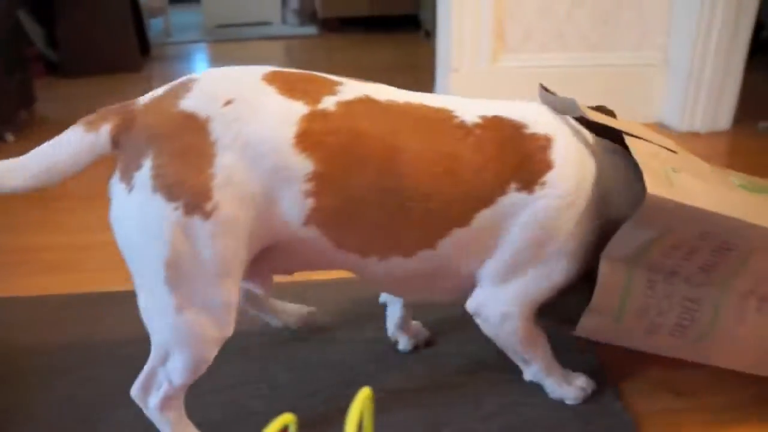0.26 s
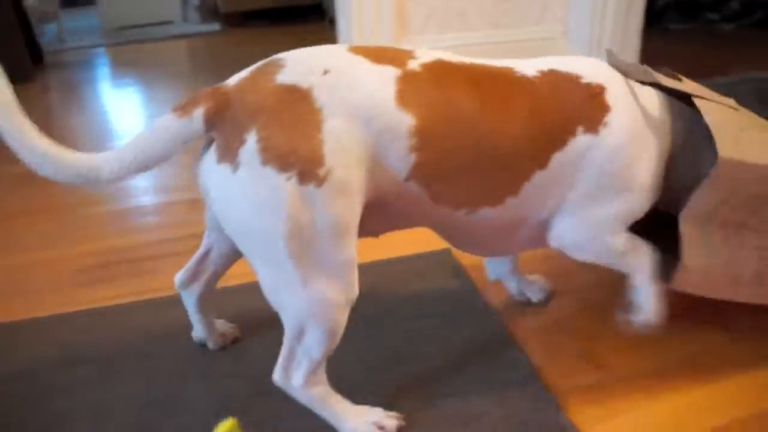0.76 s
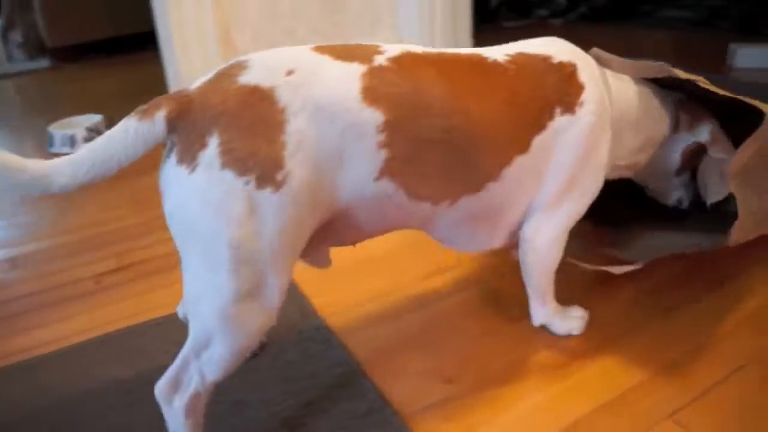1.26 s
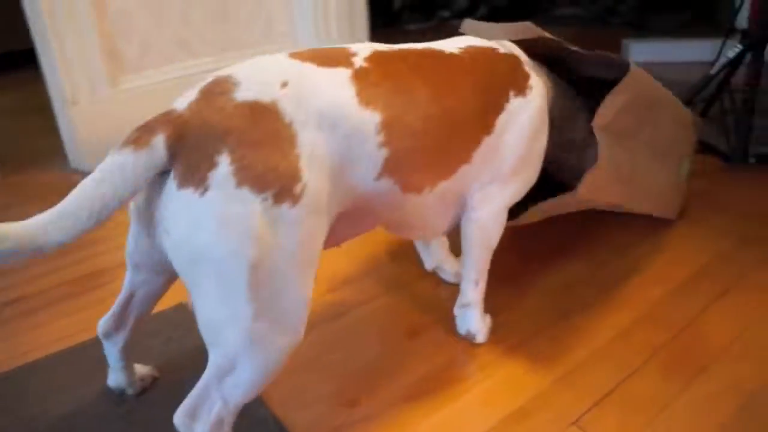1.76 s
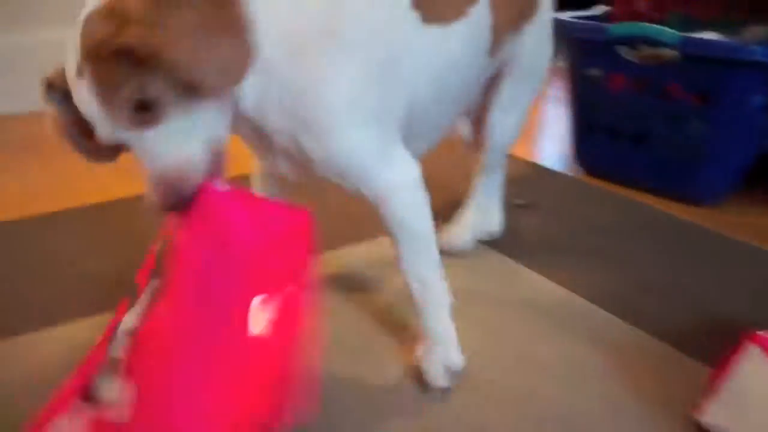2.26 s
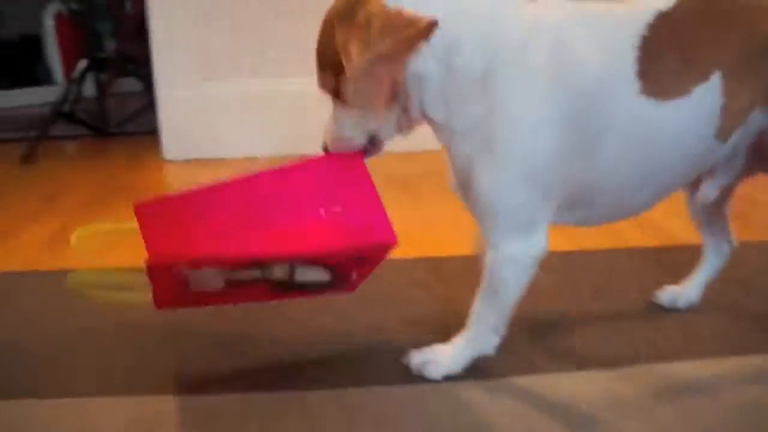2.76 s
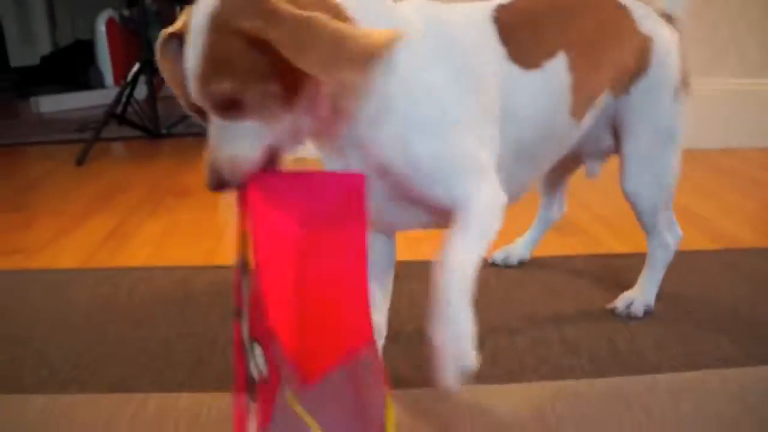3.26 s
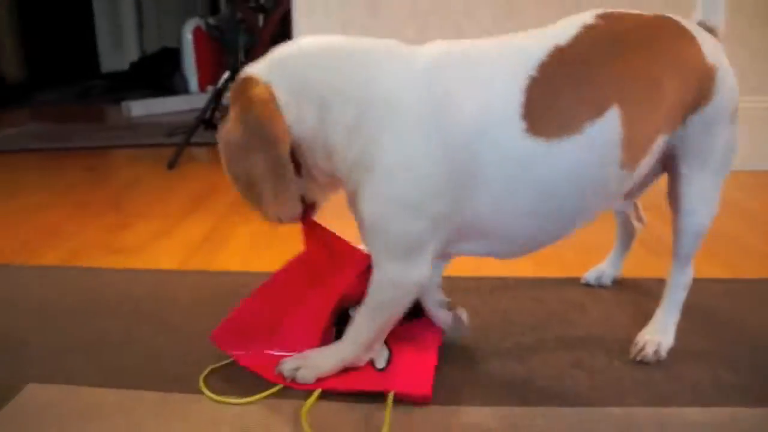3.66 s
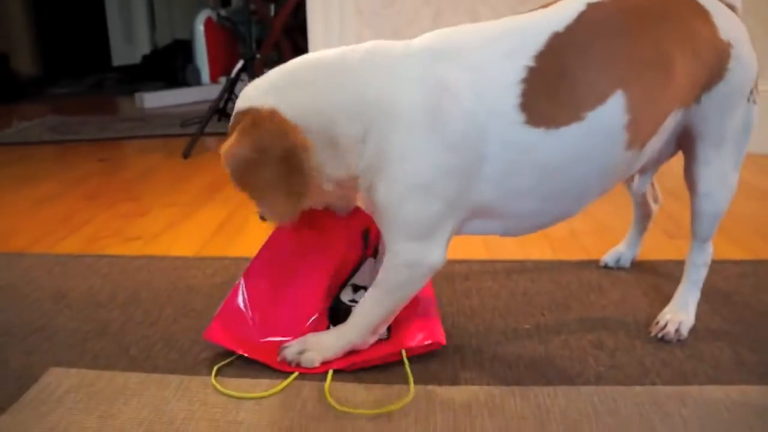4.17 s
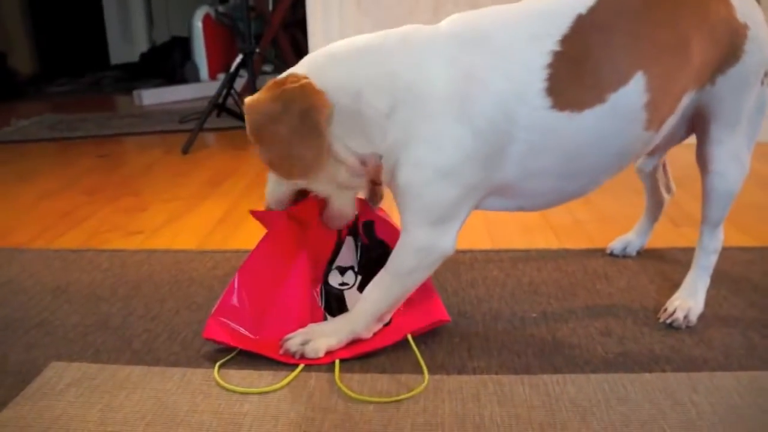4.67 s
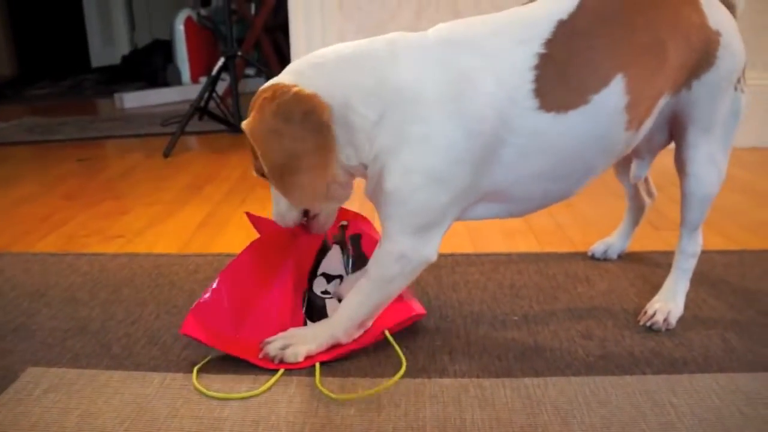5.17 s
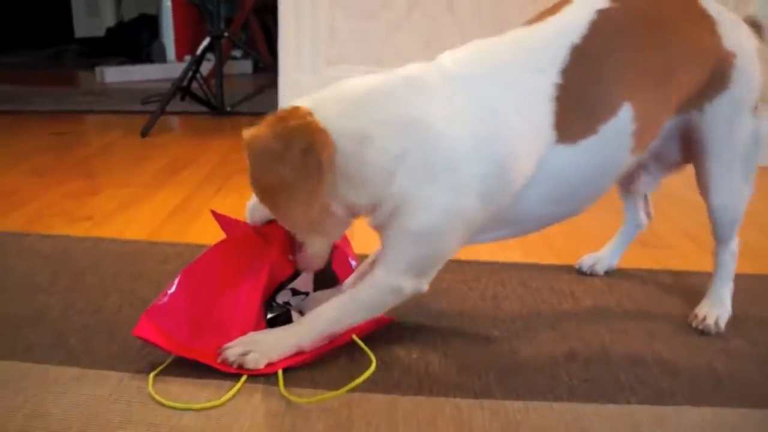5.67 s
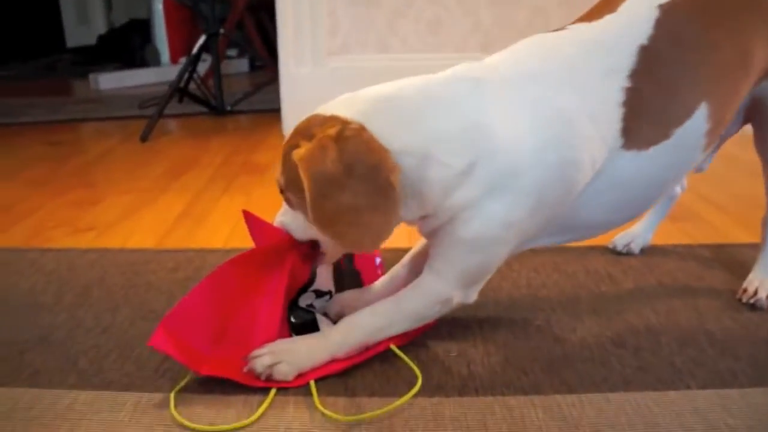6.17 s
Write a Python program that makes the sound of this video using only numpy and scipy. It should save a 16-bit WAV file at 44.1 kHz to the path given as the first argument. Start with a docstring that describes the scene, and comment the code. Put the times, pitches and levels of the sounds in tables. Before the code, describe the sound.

Close stereo sound of a dog working paper bags on a rug. First, smooth rubbing and crinkling inside a hollow paper sack with scattered pops; from about two seconds, louder thumps, knocks and crisp snaps as a stiff gift bag is shaken, pawed and torn. Soft paw steps lie beneath. The living room answers briefly, over faint rumble and hiss.

```python
"""Living room, close to a dog on a rug: it roots in a big paper sack, then paws and rips a stiff gift bag.
Each shove is shaped noise, rubbing and crinkling the sheets, while paws tread softly on the floor.
Runs of uneven jolts ring damped paper panels: sharp snaps and short crumpling runs.
Two microphones hear the room ring briefly after every snap, over a faint rumble and hiss of filtered noise."""
import sys
import numpy as np
from scipy import signal
from scipy.fft import rfft, irfft, next_fast_len
from scipy.io import wavfile
from scipy.ndimage import uniform_filter1d, map_coordinates

SR = 44100
rng = np.random.default_rng(int(sys.argv[2]) if len(sys.argv) > 2 else 0)


def file_out(sig):
    """Save sig as 16-bit WAV at sys.argv[1]."""
    # one column per channel
    cols = np.atleast_2d(sig).T
    # limit, then scale
    lim = np.clip(cols, -1, 1)
    pcm = np.round(lim * 32767).astype(np.int16)
    wavfile.write(sys.argv[1], SR, pcm)


N = 283122

# half-octave band edges in Hz
BAND_EDGES_HZ = 22 * 2 ** np.arange(0, 9.6, .5)

# colour of the house background: pitch_hz, level_db (per Hz, relative)
HOUSE_COLOUR = [(25, -17), (60, -16), (140, 5), (350, -36), (1000, -39), (3000, -35), (14000, -28.5)]
HOUSE_DB = -64.5
# likeness of diffuse sound at the two microphones: pitch_hz, likeness (correlation)
LIKENESS = [(30, .75), (80, 0.98), (300, 0.97), (1000, 0.86), (2000, 0.75), (4000, 0.23), (12000, 0.057)]
# colour difference between the two microphones: pitch_hz, right_minus_left_db
MICROPHONES = [(100, -1), (300, -0.1), (700, -1.5), (2200, 0.5), (4500, 1), (8000, -0.7), (13000, -2)]
CUTOFF_HZ = 15500

# decay of the room: pitch_hz, t60_s
ROOM_T60 = [(100, 1), (260, 0.61), (480, 0.39), (700, 0.3), (1840, 0.41), (4850, 0.36), (14000, 0.28)]
# strength of the reverberation: pitch_hz, level_db
ROOM_COLOUR = [(110, -2.5), (210, -4), (300, 1), (430, -0.5), (800, 3), (1700, -2.5), (3000, -0.5),
               (5000, -2), (14000, -2.5)]
# where the bag lies: start_s, left_lag_ms, right_minus_left_db, room_db
PLACE = [(0, 0.083, 3.5, -6), (.7, 0.073, 4, -2.5), (1.2, 0.073, 3, -6), (1.45, 0.05, 3, -2.5),
         (2.1, -0.078, 2, -2), (2.5, -0.045, 0, -3.5), (3.2, -0.027, 1.5, -4), (4.0, 0.0048, 1, -4),
         (5.0, -0.014, 1, -5), (6.4, -0.04, 0.5, -7)]

# the dog treads and braces itself on the floor: start_s, level_db (before the rustle trim)
STEPS = [(0.291, -43), (0.66, -40.5), (0.752, -43.5), (0.9, -47), (1.47, -35.5), (1.69, -44), (2.06, -38.5),
         (2.38, -32.5), (2.45, -36), (2.57, -42), (2.78, -44.5), (3.04, -37), (3.56, -39), (3.66, -39.5),
         (3.75, -42), (3.929, -35.5), (4.2, -45), (4.36, -47), (5.02, -50), (5.1, -49), (5.18, -50),
         (5.6, -46)]
STEP_RISE_S, STEP_DECAY_DB_PER_S = 0.0059, 172
# the loose bag scuffs along the floor, the pinned one hardly:
# start_s, level_db (for a bag body at full scale, before the rustle trim)
SCUFFING = [(0, -33.5), (1.4, -35), (2.0, -37), (2.5, -36.5), (3.3, -33), (4.5, -37), (5.4, -42.5),
            (6.4, -55.5)]
SCUFF_FOLLOWS = 0.39   # share of the body's swing in dB

# light brushing of the paper between shoves: start_s, level_db (before colour and rustle trim)
BRUSHING = [(0, -48), (0.42, -49.5), (0.8, -60), (1.22, -56), (1.32, -61), (1.35, -47), (1.5, -56.5),
            (1.8, -57.5), (2.2, -45), (2.32, -72), (2.4, -56), (2.8, -53), (2.9, -70), (2.98, -82),
            (3.2, -52.5), (4.45, -45), (4.55, -61), (5.95, -54), (6.05, -71), (6.26, -64), (6.42, -46)]
# colour of the brushing, one offset each: sheet_db, body_db, hiss_db
BRUSH_COLOUR_DB = (-1, -4, -2.5)
# each shove, tug or rip of the dog: start_s, length_s, sheet_db, body_db, hiss_db (before the rustle trim)
SHOVES = [(0.102, 0.068, -35, -40, -40), (0.19, 0.16, -39.5, -42, -43), (0.471, 0.078, -35, -41, -43),
          (0.556, 0.14, -41.5, -60, -42.5), (0.66, 0.038, -38, -38, -50), (0.72, 0.093, -48, -64, -44),
          (0.843, 0.21, -34.5, -40.5, -39.5), (1.09, 0.17, -46, -53.5, -47),
          (1.358, 0.079, -31, -39.5, -40.5), (1.446, 0.055, -29, -35.5, -52), (1.56, 0.044, -43, -44, -50),
          (1.66, 0.062, -48.5, -44.5, -58), (1.904, 0.11, -43, -39.5, -47),
          (2.041, 0.026, -27.5, -30.5, -39), (2.088, 0.12, -49, -66, -40.5), (2.326, 0.022, -48, -52, -49),
          (2.37, 0.16, -29.5, -31.5, -41), (2.53, 0.097, -29.5, -34, -43),
          (2.734, 0.041, -38.5, -38.5, -57), (2.97, 0.12, -45.5, -41.5, -60.5),
          (3.068, 0.14, -26, -33, -37), (3.29, 0.043, -34.5, -40, -57), (3.427, 0.13, -38, -39.5, -47),
          (3.523, 0.13, -27, -32, -38), (3.658, 0.13, -28, -32.5, -45), (3.81, 0.043, -31.5, -48, -60),
          (3.945, 0.22, -31, -37, -44), (4.164, 0.14, -34.5, -39.5, -63), (4.361, 0.041, -29.5, -39, -48),
          (4.56, 0.4, -48, -50.5, -64), (4.871, 0.035, -30, -37.5, -62), (4.98, 0.15, -44, -40, -70),
          (5.065, 0.15, -33, -41, -44), (5.237, 0.14, -31.5, -36.5, -54), (5.478, 0.15, -37, -41, -47.5),
          (5.574, 0.06, -27, -32.5, -37.5), (5.652, 0.077, -35, -51, -47),
          (5.764, 0.22, -34.5, -39.5, -40.5), (6.34, 0.1, -43, -46, -50.5)]
SHOVE_ATTACK_S, SHOVE_SAG_DB_PER_S, SHOVE_RELEASE_DB_PER_S = 0.015, 10, 241.5

# colour of the rustle: pitch_hz, level_db (per Hz, relative within each part)
PAPER = [(35, -25), (70, -12), (140, -3.5), (450, 4), (1100, 1.5), (2700, -3), (5000, -13.5), (11500, -20),
         (15500, -33.5)]
# fur slides smoothly in the sack, teeth make the gift bag crackle:
# start_s, rubbing_db (smooth rubbing relative to the creases)
RUBBING = [(0, 3), (1.2, 7), (1.45, 3), (2.2, -5), (2.5, -7), (3.6, -8), (6.4, -3)]
CREASE_TOP_HZ = 3200
RUSTLE_DB, SNAP_DIRECT_DB = -0.79, -1.5   # trims of the rustle and of the direct sound of the snaps

# air resonances of the big sack, then of the gift bag held open:
# start_s, end_s, pitch_hz (before bending), width_hz (likewise), level_db
HOLLOWS = [(0, 1.6, 226, 50, 5), (0, 1.05, 337, 65, 1.5), (0.267, 0.37, 963, 55, 0),
           (1.39, 1.53, 654, 70, 0), (2.65, 2.71, 1240, 35, 5.5), (3.085, 3.02, 465, 60, 1.5),
           (3.292, 3.53, 795, 60, 0.5)]
HOLLOW_BEND_OCTAVES, HOLLOW_BENDS_PER_S = .03, 12

# small folds give way at random while the paper is worked
TICKS_PER_S, TICK_MS, TICK_HZ, TICK_Q, TICK_CRACK_DB = 60, 1.0, 1720, 1.0, -32
TICK_OVER_SHEET_DB, TICK_SPREAD_DB, TICK_SPREAD_OCTAVES = 6.5, 0.5, 0.66

# paws and muzzle knock the bag, whose hollow rings higher or lower as it is bent:
# start_s, length_ms, level_db (energy as rms over one ms, before trims), pitch_hz, q (raised to 0.45 at least)
KNOCKS = [(0.292, 9.1, -24, 400, 2), (1.399, 8.5, -23.5, 640, 1.1), (1.496, 13, -16.5, 404, 0.43),
          (1.807, 5.4, -22.5, 224, 1.6), (1.916, 7.1, -21, 406, 0.38), (2.046, 9.7, -16, 400, 0.74),
          (2.403, 8.6, -20, 480, 0.9), (2.4568, 7.6, -14, 403, 0.41), (2.652, 9.8, -10.5, 590, 1.9),
          (3.055, 14.4, -11, 310, 0.61), (3.091, 13, -5.5, 480, 2.6), (3.16, 25, -11, 430, 2.2),
          (3.202, 6.5, -11, 520, 1.3), (3.297, 5.1, -18, 447, 1.4), (3.934, 8.5, -10, 372, 0.63),
          (4.368, 6, -20, 402, 0.37), (4.485, 2.3, -22.5, 620, 1.55), (4.741, 7.4, -20, 373, 0.47),
          (4.906, 4.4, -18, 530, 1.3), (5.1828, 4.5, -16, 395, 1.06), (5.573, 8.7, -12, 398, 0.53),
          (5.605, 7.9, -14, 380, 0.35), (5.783, 4.4, -16, 474, 1.1)]
KNOCK_CRACK_DB = -35
# the loud buckles of the paper: start_s, length_ms, level_db (energy as rms over one ms, before trims),
# pitch_hz (panel), q (panel, raised to 0.45 at least), crack_db (crease, relative to the panel)
SNAPS = [(0.111, 4.3, -28, 1180, 0.79, -20), (0.263, 7.9, -20, 1580, 0.63, -24),
         (0.283, 14.7, -11, 1020, 0.9, -36), (0.459, 10.6, -16.5, 1260, 0.7, -23),
         (0.5714, 2.55, -9.5, 2800, 1.05, -35), (0.632, 4.2, -16.5, 2820, 0.42, -24),
         (0.655, 6.5, -10, 2130, 0.58, -34), (0.888, 9.9, -11, 1780, 0.6, -26),
         (0.9883, 5.4, -9.5, 3650, 0.74, -25), (0.994, 11.3, -10, 2580, 0.57, -27),
         (1.372, 2.7, -9.5, 1380, 1.7, -22), (1.441, 3.5, -19, 2400, 0.66, -6),
         (1.473, 10, -13, 1000, 0.69, -26), (1.493, 10.3, -11.5, 1350, 0.9, -26),
         (1.853, 3.3, -24, 1230, 0.97, -19), (1.916, 9.8, -15, 1040, 0.54, -17),
         (2.033, 8.6, -21, 1190, 0.51, -17), (2.047, 3.2, -6.5, 1440, 0.92, -28),
         (2.1939, 5.6, -16.5, 1030, 0.37, -24), (2.271, 4.9, -29, 1330, 1, -10),
         (2.3756, 6.1, -8, 2390, 0.63, -12), (2.384, 12, -5, 1980, 0.72, -8.5),
         (2.403, 4.7, -14, 2200, 0.93, 1.5), (2.4583, 3, -10, 1320, 1.2, -22),
         (2.5, 2.6, -19, 1400, 1.2, -27), (2.5373, 1.6, -11, 1850, 1.8, -3),
         (2.571, 13.7, -7, 1770, 0.55, -30), (2.6, 4.8, -11.5, 3140, 0.55, -17),
         (2.6468, 4, -15, 1850, 1.3, -26), (2.653, 16, -12, 1170, 0.63, -28),
         (2.7781, 3, -24, 1680, 0.51, -13), (2.8586, 3.7, -30.5, 1000, 0.56, -33),
         (3.055, 23, -16, 2170, 0.92, -27.5), (3.093, 15.7, -11, 1370, 0.64, -21),
         (3.149, 4.8, -8, 1520, 0.81, -1.5), (3.2, 5.8, -9, 1230, 0.33, -28),
         (3.304, 8.6, -14.5, 920, 0.4, -37), (3.3704, 4, -10, 2600, 0.65, -10.5),
         (3.4682, 4.5, -11.5, 2440, 1.37, -24), (3.5225, 2.8, -24, 2600, 0.58, -14),
         (3.536, 16.8, -3, 1920, .9, -36), (3.5671, 2.2, -15.5, 1740, 2.7, -2.5),
         (3.584, 6, -9, 1090, 0.32, -35), (3.619, 2.1, -8, 2300, 1.3, -20),
         (3.65, 3.1, -11.5, 3360, 1, -29), (3.6878, 2.34, -10, 1580, 0.36, -18),
         (3.693, 1.04, -10.5, 2310, 0.39, -9), (3.7203, 1.8, -20, 3000, 0.61, -16),
         (3.726, 0.78, -12.5, 3630, 1, -21), (3.7598, 1.6, -12, 3370, 0.52, -15),
         (3.8365, 0.73, -16, 2200, 0.63, -24), (3.889, 0.79, -29, 2580, 1.4, -20),
         (3.9345, 2.6, -16.5, 2030, 0.82, -12), (3.941, 3.8, -15.5, 2040, 0.69, -21),
         (3.9729, 8.1, -4.5, 1630, 0.59, -25), (3.985, 3.8, -11.5, 1700, 0.39, -24),
         (3.9901, 2.7, -12, 1250, 0.31, 1), (4.0413, 1.8, -9.5, 1190, 0.6, 1),
         (4.0675, 2.55, -13, 910, 0.63, 0.5), (4.0758, 3.7, -13.5, 1600, 0.36, -25),
         (4.1085, 1.53, -10, 2070, 1.2, -3.5), (4.12, 1.63, -12, 1250, 0.32, -28),
         (4.1454, 5.2, -16.5, 1350, 1.3, -20), (4.153, 2.05, -15.5, 1800, .5, -16),
         (4.1956, 0.7, -16, 1900, 1.2, -24), (4.2169, 1.5, -19.5, 1800, 0.46, -34),
         (4.2658, 1.5, -27.5, 3200, 1, -24), (4.2938, 1.74, -19.5, 1200, 0.5, -30),
         (4.3933, 4.3, -19.5, 1570, 0.73, -24), (4.4064, 2.7, -15, 1240, 0.65, -26),
         (4.4505, 0.71, -21, 1030, 1.2, -25), (4.463, 7.4, -22, 1880, 0.39, -12),
         (4.589, 7.4, -21, 950, 0.47, -20), (4.62, 1.6, -31, 2000, 0.97, -20),
         (4.6574, 4.1, -28.5, 690, 1.2, -19), (4.741, 4.96, -22.5, 1100, 0.61, -24),
         (4.7852, 4, -23.5, 2330, 0.92, -17), (4.886, 3.7, -18.5, 1450, 0.84, -20),
         (4.8995, 2.8, -12.5, 1650, 0.68, -21), (4.906, 2.6, -12.5, 1660, 0.69, -23),
         (5.03, 2.25, -11, 1120, 2.1, -38), (5.0683, 0.6, -9, 2780, 1.14, -19),
         (5.106, 0.54, -16, 2520, 0.66, -30), (5.1237, 2, -11.5, 2060, 0.35, -7),
         (5.131, 1.9, -27.5, 700, 0.85, 15), (5.1818, 1.85, -10.5, 2160, 0.51, -12),
         (5.2532, 1.4, -26, 2600, 0.75, -16), (5.2683, 1.47, -10, 2690, 0.69, -5),
         (5.28, 2.3, -15.5, 2400, 1, -26), (5.2928, 1.5, -25, 2160, 0.55, -22),
         (5.3313, 2.5, -10, 1590, 0.44, -17), (5.3499, 1.7, -10.5, 1320, 0.36, -2.5),
         (5.3623, 1.03, -14.5, 1710, 0.72, -22), (5.367, 1.8, -19.5, 1700, 1.9, 5),
         (5.4443, 3.5, -17.5, 800, 0.57, -22), (5.484, 4.6, -25, 990, 1.2, -20),
         (5.529, 2.1, -19.5, 1500, 1.5, -30), (5.54, 4.8, -15, 910, 1.1, -35),
         (5.571, 14.3, -7.5, 1020, 0.6, -28), (5.586, 4.7, -8.5, 1110, 0.3, -35),
         (5.605, 12.8, -10, 1020, 0.38, -19), (5.699, 6.2, -21, 720, 0.69, -33),
         (5.7812, 2.5, -9.5, 1200, 0.5, -6), (5.7917, 2.2, -9, 2830, 1.7, -37),
         (5.8083, 3.5, -7.5, 1740, 0.36, -33), (5.8952, 1.03, -6.5, 3030, 1.03, -3),
         (5.9657, 2.6, -17.5, 2970, 0.85, -5), (6.269, 2.1, -40.5, 2970, 0.66, -8),
         (6.368, 3.6, -34, 1700, 0.92, -20), (6.403, 3.6, -27, 1690, 1.8, -25)]
# a longer run of slips moves more of the air in the bag
THUMP_DB, THUMP_DB_PER_DOUBLING = -25, 3.5   # for a run of one ms; per doubling of its length
# the crease cracks brighter once the tear is open: start_s, pitch_hz (centre of the crack)
CRACK_PITCH = [(4.2, 5130), (5.1, 6500)]


def from_db(db):
    """Decibels to gain."""
    return 10 ** (np.asarray(db) / 20)


def unit(x, axis=None):
    """Scale to an rms of one."""
    return x / np.sqrt(np.mean(x ** 2, axis=axis, keepdims=True) + 1e-20)


def in_time(rows):
    """Each column of a curve at every sample."""
    s, *columns = np.transpose(rows)
    return [np.interp(np.arange(N) / SR, s, column) for column in columns]


def at_hz(points, hz):
    """Read a table on a log-frequency axis."""
    table_hz, values = np.transpose(points)
    return np.interp(np.log(hz), np.log(table_hz), values)


def passband(x, edges_hz, kind="band", order=2):
    """Butterworth filter."""
    edges_hz = np.clip(edges_hz, 10, .45 * SR)
    return signal.sosfilt(signal.butter(order, edges_hz, kind, fs=SR, output="sos"), x + 1e-18)


def drift(rate):
    """Slow chance with an rms of one, through a given number of random points per second."""
    knots = rng.standard_normal(int(rate * N / SR) + 2)
    return unit(np.interp(np.arange(N) * rate / SR, np.arange(len(knots)), knots))


def pan(right_db):
    """Left and right gain for a level difference."""
    return from_db(right_db * np.array([[-.5], [.5]]))


def bands(pairs):
    """Half-octave stereo bands of two (mid, side) pairs in turn; the microphones agree less in the treble."""
    for k, edges in enumerate(zip(BAND_EDGES_HZ, BAND_EDGES_HZ[1:])):
        mid, side = passband(pairs[k % 2], edges)
        hz = np.sqrt(edges[0] * edges[1])
        alike = np.clip(at_hz(LIKENESS, hz), -1, 1)
        yield hz, np.sqrt(1 + alike) * mid + np.sqrt(1 - alike) * side * [[1], [-1]]


def background():
    """Steady low rumble and hiss of the house: noise coloured band by band."""
    noise = rng.standard_normal((2, 2, N))
    coloured = sum(band * from_db(at_hz(HOUSE_COLOUR, hz)) for hz, band in bands(noise))
    return from_db(HOUSE_DB) * unit(coloured)


def room(x, gap_s=0.0003, build_s=0.00031, size=18000, count=16):
    """Reflections thicken after a short gap and die away by band, in a new pattern for each equal stretch."""
    t = np.maximum(np.arange(size) / SR - gap_s, 0)
    responses = 0
    for hz, band in bands(rng.standard_normal((2, 2, count * size))):
        decay = from_db(-60 * t / at_hz(ROOM_T60, hz)) * (1 - np.exp(-t / build_s))
        envelope = unit(decay) * from_db(at_hz(ROOM_COLOUR, hz)) / np.sqrt(2 * size)
        responses = responses + band.reshape(2, count, size) * envelope
    out = np.zeros((2, N + size))
    for k, span in enumerate(np.array_split(np.arange(N), count)):
        echo = signal.fftconvolve(x[None, span], responses[:, k], axes=1)
        out[:, span[0]:span[-1] + size] += echo
    return out[:, :N]


def treading(body):
    """Gain of the floor: soft paw steps over scuffing that partly follows the force on the bag body."""
    t = np.arange(N) / SR
    scuff = body ** SCUFF_FOLLOWS * from_db(in_time(SCUFFING)[0])
    power = scuff ** 2
    for s, db in STEPS:
        span = slice(int(s * SR), int(s * SR) + SR)
        age = t[span] - s
        fall_db = STEP_DECAY_DB_PER_S * np.maximum(age - STEP_RISE_S, 0)
        step = np.clip(age / STEP_RISE_S, 0, 1) * from_db(db - fall_db)
        power[span] += step ** 2
    return np.sqrt(power)


def shoving():
    """Gains of body, sheets and surface: over light brushing, each shove sets in, slackens and dies away."""
    t = np.arange(N) / SR
    power = np.outer(from_db(BRUSH_COLOUR_DB), from_db(in_time(BRUSHING)[0])) ** 2
    for s, length_s, *levels_db in SHOVES:
        span = slice(max(int(s * SR), 0), int(s * SR) + SR)
        age = t[span] - s
        fall_db = SHOVE_SAG_DB_PER_S * age + SHOVE_RELEASE_DB_PER_S * np.maximum(age - length_s, 0)
        shape = np.clip(age / SHOVE_ATTACK_S, 0, 1) * from_db(-fall_db)
        power[:, span] += np.outer(from_db(levels_db), shape) ** 2
    sheet, body, hiss = np.sqrt(power)
    return body, sheet, hiss


def rustle(gains, grains_per_s=500, size_db=1.5, clump_db=4.0, patchy_db=(2.5, 2.0, 3.5, 3.5)):
    """Clumps of tiny creases and snapping fibres over smooth rubbing, through floor, bag, sheets and surface."""
    born = rng.random(N) < grains_per_s * from_db(clump_db * drift(70)) / SR
    grains = born * from_db(size_db * np.minimum(rng.exponential(1, N), 3.5))
    # even out the clumps' loudness: the force of the dog alone sets the level
    grains = grains / np.sqrt(uniform_filter1d(grains ** 2, size=4096) + 1e-4)
    rub = from_db(in_time(RUBBING)[0])
    sliding = rng.standard_normal((2, 2, N))
    creasing = np.hypot(grains, rub) / np.hypot(1, rub) * sliding
    # tiny creases crackle in the middle range; above them the surface hisses smoothly
    crackle = passband(creasing, CREASE_TOP_HZ, "low", order=1)
    smooth = passband(sliding, CREASE_TOP_HZ, "high", order=1)
    parts = np.zeros((4, 2, N))
    for hz, band in bands(crackle + smooth):
        part = np.searchsorted([176, 700, 4000], hz)   # Hz between floor, bag body, sheets and surface
        parts[part] += band * from_db(at_hz(PAPER, hz) + patchy_db[part] * drift(35))
    return sum(unit(part) * gain for part, gain in zip(parts, gains))


def hollows(x, bend, size=256):
    """The air inside a bag colours whatever is stirred in it; its pitch shifts as the walls bend."""
    out = x.copy()
    for start_s, end_s, hz, width_hz, db in HOLLOWS:
        state = np.zeros(x.shape[:-1] + (2,))
        # the ring may die out for a tenth of a second after its input stops
        for i in range(max(int(start_s * SR), 0), int(end_s * SR) + SR // 10, size):
            b, a = signal.iirpeak(hz * bend[i], hz / width_hz, fs=SR)
            stirred = x[..., i:i + size] * (i < end_s * SR)
            ring, state = signal.lfilter(b, a, stirred, zi=state)
            out[..., i:i + size] += from_db(db) * ring
    return out


def ticks(sheet):
    """Small buckles at random moments, as strong as the sheets are being worked; rows as in SNAPS."""
    chance = rng.standard_normal((1024, 3)).clip(-2, 2)
    times = np.cumsum(rng.exponential(1, len(chance))) / TICKS_PER_S
    rows = []
    for s, (length, strength, pitch) in zip(times, chance):
        if s < N / SR:
            sheet_db = 20 * np.log10(sheet[int(s * SR)])
            level_db = sheet_db + TICK_OVER_SHEET_DB + TICK_SPREAD_DB * strength
            hz = TICK_HZ * 2 ** (TICK_SPREAD_OCTAVES * pitch)
            rows.append((s, TICK_MS * 2 ** length, level_db, hz, TICK_Q, TICK_CRACK_DB))
    return rows


def buckles(sheet):
    """Knocks, snaps and ticks as (start_s, length_ms, level_db, pitch_hz, q, thump_db, crack_db)."""
    for s, length_ms, db, hz, q in KNOCKS:
        yield s, length_ms, db, hz, q, THUMP_DB, KNOCK_CRACK_DB
    for s, length_ms, db, hz, q, crack_db in list(SNAPS) + ticks(sheet):
        thump_db = THUMP_DB + THUMP_DB_PER_DOUBLING * np.log2(length_ms)
        yield s, length_ms, db, hz, q, thump_db, crack_db


def slips(length_ms, per_ms, spread_db, first_db, swell_db, catch_db=2.5, catch_ms=1.6, size=2048):
    """A fold gives way in uneven slips that catch and let go; in short runs the first jolt stands out more."""
    ms = np.arange(size) * 1000 / SR
    run = (rng.random(size) < per_ms * 1000 / SR) * rng.choice([-1, 1], size)
    catching = np.interp(ms / catch_ms, np.arange(64), np.r_[1, rng.standard_normal(63)])
    run = run * from_db(spread_db * rng.standard_normal(size) + catch_db * catching)
    run = run * np.exp(-(ms / length_ms) ** 4)
    run = run * from_db(swell_db * np.minimum(ms / length_ms, 2))
    run = unit(run) / np.sqrt(size)   # total energy of one
    run[0] += from_db(first_db) / length_ms * rng.choice([-1, 1])
    return run


def buckle(jolts, hz, q, thump_db, crack_db, crack_hz, crack_span=1.52, thump_hz=(230, 650),
           crack_low_hz=2000, low_hz=120):
    """Jolts ring a damped paper panel, thump the air in the bag and crack along the crease."""
    b, a = signal.iirpeak(hz, max(q, .45), fs=SR)
    panel = unit(signal.lfilter(b, a, signal.lfilter(b, a, jolts)), axis=1)
    thump = from_db(thump_db) * unit(passband(jolts, thump_hz), axis=1)
    crease = passband(jolts, (crack_hz / crack_span, crack_hz * crack_span), order=1)
    crack = from_db(crack_db) * unit(passband(crease, crack_low_hz, "high"), axis=1)
    # a light sheet radiates little bass
    radiated = passband(panel + thump + crack, low_hz, "high")
    return radiated * np.sqrt(SR / 1000 / jolts.shape[1])   # energy as rms over one ms


def snaps(sheet, scatter_db=-7.0, scatter_hz=2800, wander_db=1.0):
    """Every buckle as it reaches the microphones, and as it spreads into the room."""
    direct, spread = np.zeros((2, N + SR)), np.zeros(N + SR)
    for s, length_ms, level_db, *colour in buckles(sheet):
        jolts = slips(length_ms, per_ms=4.3, spread_db=4.0, first_db=4.0, swell_db=0.5)
        # summed over all directions, the slips act as one even jolt in the middle of the run
        blow = signal.unit_impulse(len(jolts), int(length_ms / 2 * SR / 1000))
        crack_hz = np.interp(s, *np.transpose(CRACK_PITCH))
        snap, all_round = from_db(level_db) * buckle(np.array([jolts, blow]), *colour, crack_hz)
        # the crumpled sheet sends its treble differently to each side
        facets = unit(rng.standard_normal(32)) / np.sqrt(32)
        treble = passband(snap, scatter_hz, "high", order=1)
        side = from_db(scatter_db) * signal.lfilter(facets, 1, treble)
        span = slice(int(s * SR), int(s * SR) + len(snap))
        direct[:, span] += np.array([snap + side, snap - side]) * pan(wander_db * rng.standard_normal())
        spread[span] += all_round
    return direct[:, :N], spread[:N]


def scene():
    """The paper and its echo in the room, heard from where the bag lies, over the house."""
    lag_ms, right_db, room_db = in_time(PLACE)
    house = background()
    body, sheet, hiss = shoving()
    rubbing = from_db(RUSTLE_DB) * rustle((treading(body), body, sheet, hiss))
    bend = 2 ** (HOLLOW_BEND_OCTAVES * drift(HOLLOW_BENDS_PER_S))
    direct, spread = snaps(sheet)
    into_room = hollows(spread + rubbing.mean(axis=0), bend)
    echo = room(into_room * from_db(room_db))
    near = hollows(from_db(SNAP_DIRECT_DB) * direct + rubbing, bend)
    left, right = near + echo
    # the left microphone hears the bag later where the lag is positive
    left = map_coordinates(left, [np.arange(N) - lag_ms * SR / 1000], order=3)
    return np.array([left, right]) * pan(right_db) + house


def record(dry, top=0.71):
    """Each microphone has its own colour; the loudest peaks are rounded and the top is cut."""
    size = next_fast_len(N + SR // 10)
    hz = np.maximum(np.fft.rfftfreq(size, 1 / SR), 1)
    heard = irfft(rfft(dry, size) * pan(at_hz(MICROPHONES, hz)), size)[:, :N]
    rounded = top * np.tanh(heard / top)
    return signal.sosfilt(signal.ellip(10, .1, 90, CUTOFF_HZ, fs=SR, output="sos"), rounded)


dry = scene()
out = record(dry)
file_out(out)
```